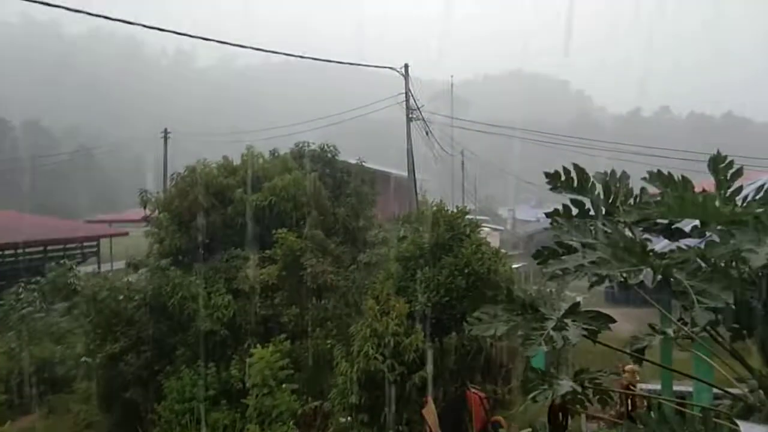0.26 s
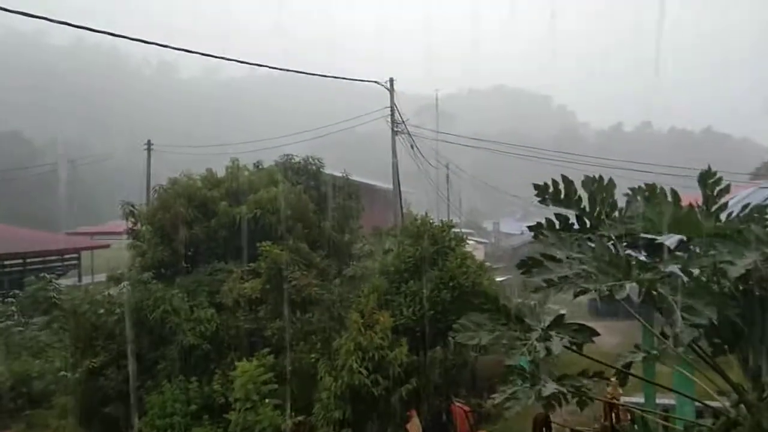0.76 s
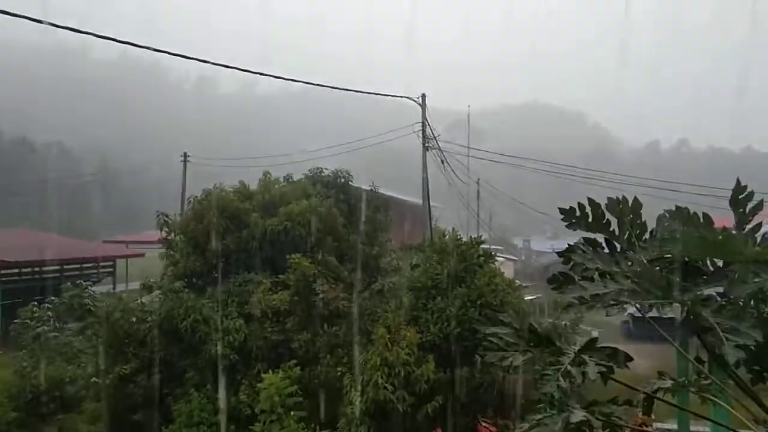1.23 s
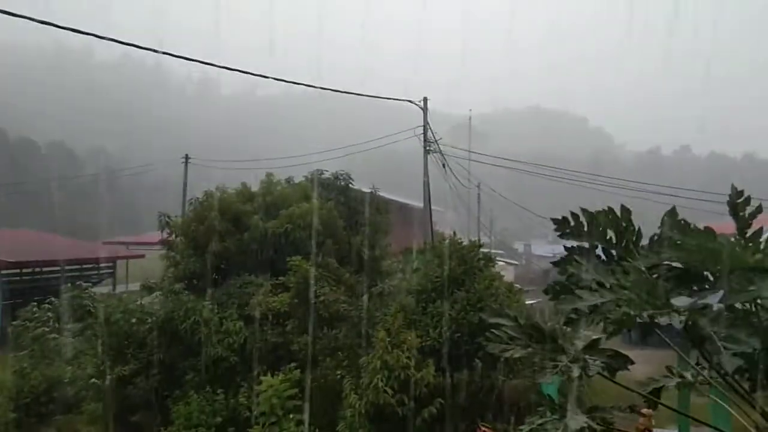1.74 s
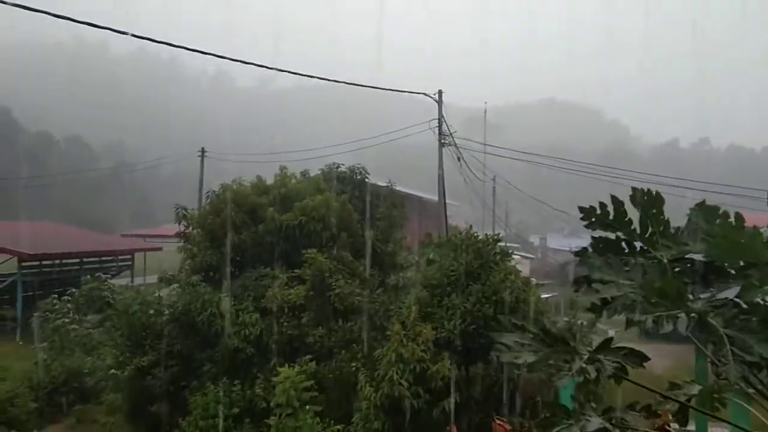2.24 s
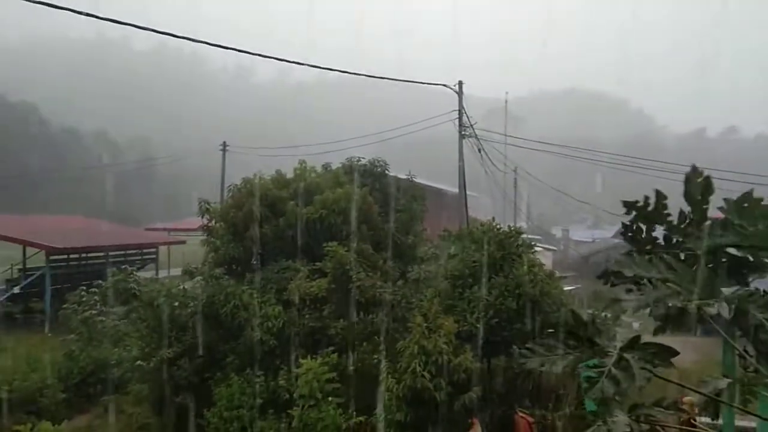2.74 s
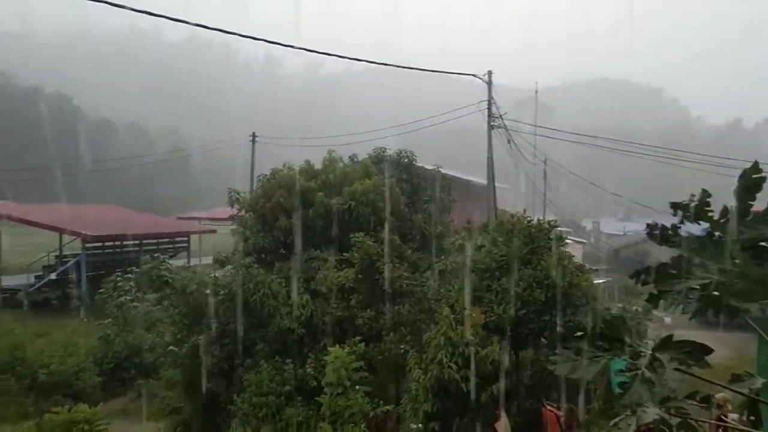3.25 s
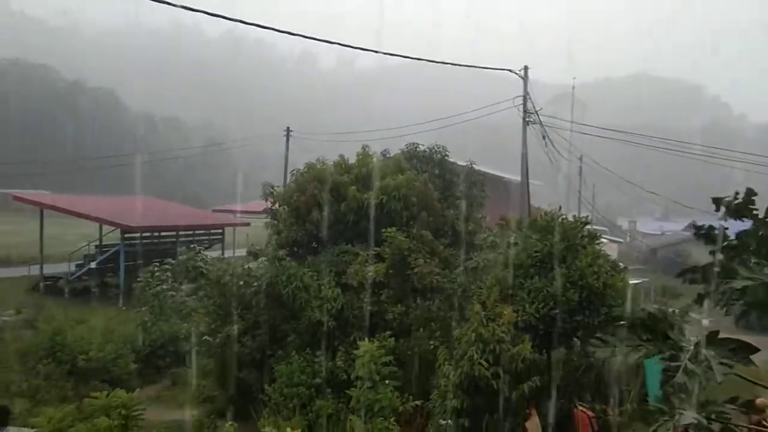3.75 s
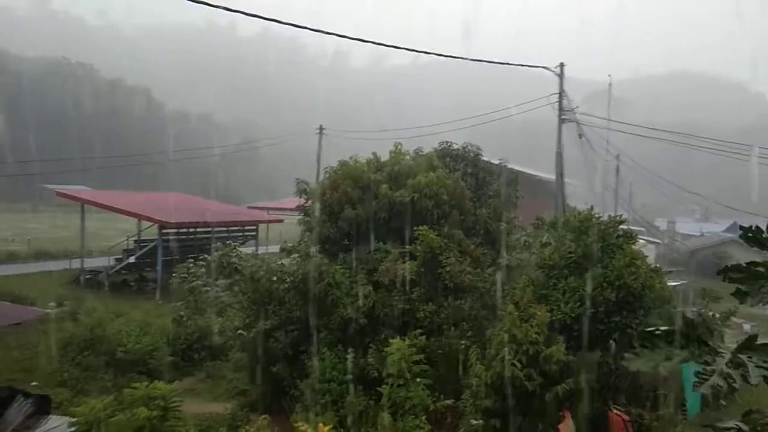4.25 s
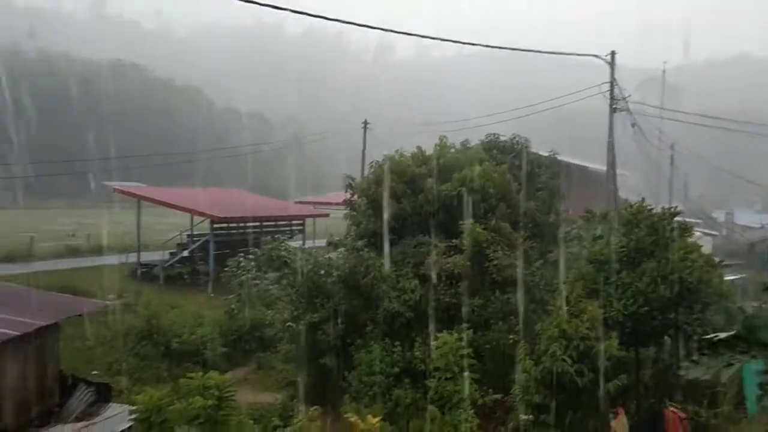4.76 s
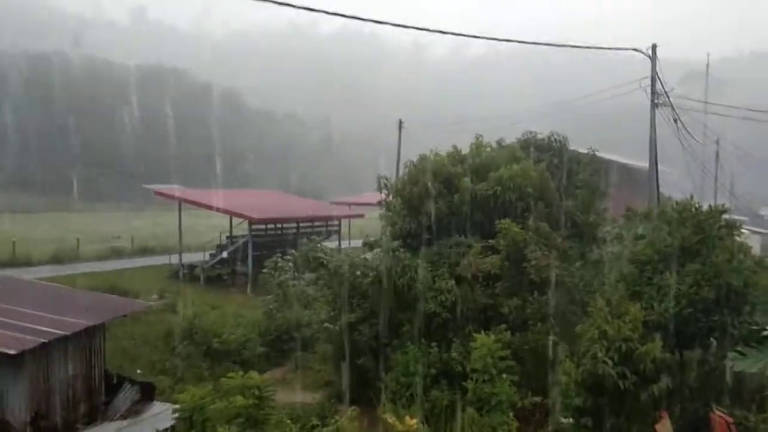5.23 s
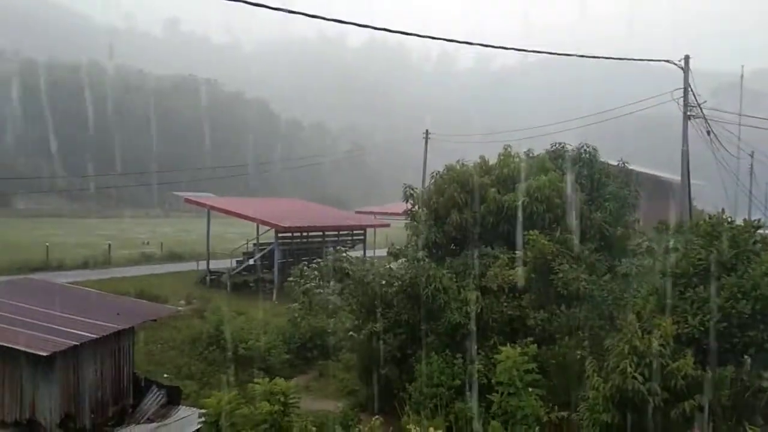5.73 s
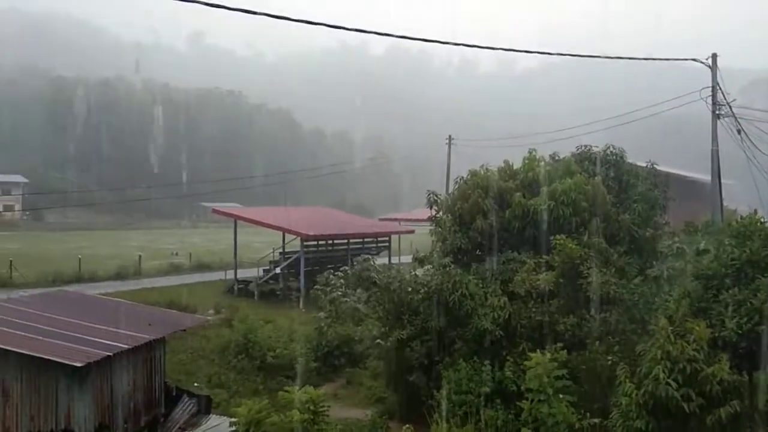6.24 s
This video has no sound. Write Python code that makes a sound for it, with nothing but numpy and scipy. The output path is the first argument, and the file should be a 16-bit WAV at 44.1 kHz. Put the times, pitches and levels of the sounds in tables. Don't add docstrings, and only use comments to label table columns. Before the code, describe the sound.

A loud, continuous hiss of torrential rain fills the whole stretch, falling on foliage, tin roofs and wet ground. Leaf spray brightens it briefly near the start, roof drumming thickens the middle, and a low wind gust rumbles at about three seconds. Small run-off slaps and faint drop ticks sit almost buried within it. It is heard outdoors from a porch through one phone microphone, nearly mono, with dulled highest treble.

```python
import sys
import numpy as np
from scipy import signal
from scipy.fft import rfft, irfft, next_fast_len
from scipy.io import wavfile
from scipy.ndimage import uniform_filter1d, minimum_filter1d

SR = 44100
rng = np.random.default_rng(int(sys.argv[2]) if len(sys.argv) > 2 else 0)


def gain_from_db(level_db):
    decades = np.asarray(level_db, float) / 20
    return 10 ** decades


def wav_record(signal):
    frames = np.transpose(np.atleast_2d(signal))
    bounded = np.clip(frames, -1, 1)
    quanta = np.round(bounded * 32767).astype(np.int16)
    wavfile.write(sys.argv[1], SR, quanta)


N = 286209


def set_rms(x, db):
    return x * gain_from_db(db) / np.sqrt(np.mean(x ** 2))


def bell(x, centre, width):
    return np.exp(-((x - centre) / width) ** 2)


def walk(rate_hz):
    hold = int(SR / rate_hz)
    steps = np.repeat(rng.standard_normal(N // hold + 1), hold)
    slewed = uniform_filter1d(uniform_filter1d(steps, hold), hold)
    return 1.4 * slewed[:N]


def downpour(near_db=-16, near_hz=9000, flicker_db=0.07, spatter_db=0.64, top_hz=15510):
    # frequency in Hz, level in dB per Hz.
    colour = [(15, -66), (25, -37), (38, -35), (70, -22.5), (113, -14), (250, -10), (270, -8.5),
              (520, -9.5), (600, -5.5), (950, -6), (1500, -3.5), (2000, -1.5),
              (2570, .5), (2950, -2.5), (3250, -7), (3550, -10), (3900, -8.5), (4300, -5.5), (5650, -3.5),
            (6200, -7.5), (7300, -19), (8400, -28), (10200, -35.5), (12000, -45.5), (13200, -43),
            (15500, -43)]
    change_db = weather()
    size = next_fast_len(N)
    octave = np.log2(np.maximum(np.arange(size // 2 + 1) * SR / size, 1))

    near_share = np.clip(gain_from_db(near_db) * 2 ** octave / near_hz, 0, .95)
    far = rfft(rng.standard_normal(N), size)
    near = rfft(near_drops(), size)
    hz, db = np.transpose(colour)
    tone = gain_from_db(np.interp(octave, np.log2(hz), db))
    spectrum = (np.sqrt(1 - near_share ** 2) * far + near_share * near) * tone
    spectrum[octave > np.log2(top_hz)] = 0

    rain, spatter = 0, walk(36)
    for centre in np.arange(4, 14.6, .5):
        crossfade = np.cos(np.pi * np.clip(octave - centre, -.5, .5)) ** 2
        band = irfft(spectrum * crossfade, size)[:N]
        restless_db = flicker_db * (1 + 1.2 * max(centre - 12.5, 0))
        spatter_here = spatter_db * bell(centre, 12.82, .8) * spatter
        rain = rain + band * gain_from_db(change_db(centre) + spatter_here + restless_db * walk(12))
    return set_rms(rain, -14)


def near_drops(drops_per_s=30000, spread_db=4.0):
    count = rng.poisson(drops_per_s / SR, N)
    size = gain_from_db(spread_db * rng.exponential(size=N))
    return set_rms(np.sqrt(count) * size * rng.standard_normal(N), 0)


def weather():
    # time in seconds, strength in dB, spray off the nearest leaves in dB as the phone turns.
    rain = [(0, 0.6, 1.6), (.6, -1.2, 5.5), (1.1, -0.35, -0.2), (1.45, 0, 1.3), (1.9, -.5, .2),
            (2.4, -0.26, 0.2), (3.0, 0.15, -1.5), (3.6, 0.3, -0.9), (4.1, .5, 0.1), (5.0, 0.66, -.5),
            (5.5, 0.4, -.4), (6.1, 0.9, -1.5), (6.49, .5, -2.8)]
    # time in seconds, rumble in dB, half length in seconds.
    gusts = [
        (.85, -3, .12),
        (3.1, 9, .35),
        (3.7, 1, .3),
        (4.3, 4, .15),
        (4.8, -2, .2),
        (5.7, 1.5, .5),
    ]
    # time in seconds, drumming in dB, half length in seconds.
    sheets = [
        (2.2, 1.5, 0.32),
        (3.0, 0.7, .2),
        (3.75, 1.6, .4),
    ]
    # time in seconds, dB above the hiss, half length in seconds.
    slaps = [(.775, 2, .012), (1.197, 2, .02), (2.67, 2, 0.013), (3.055, 1, 0.01), (4.274, 3, .015),
             (4.914, 0, 0.0067), (5.038, 4, 0.016), (5.087, 2.5, 0.0089), (5.25, 4, 0.015),
             (5.317, 2.5, 0.013), (5.38, 2, 0.018), (6.012, -1, .012), (6.38, 2, 0.011)]
    t = np.arange(N) / SR

    def bumps(rows):
        return sum(db * bell(t, at, half_s) for at, db, half_s in rows)

    s, strength_db, spray_db = np.transpose(rain)
    strength, spray = np.interp(t, s, strength_db), np.interp(t, s, spray_db)
    wind, drumming, slapping = bumps(gusts), bumps(sheets), bumps(slaps)
    spray_peak = np.log2(6000)

    def change_db(octave):
        hz = 2 ** octave
        body = strength * (1 + 0.68 * (hz > 3000))
        spray_octaves = 0.38 if octave < spray_peak else 0.93
        leaves = spray * bell(octave, spray_peak, spray_octaves)
        roofs = drumming * bell(octave, np.log2(450), 2)
        ground = slapping * bell(octave, np.log2(2550), 0.3)
        rumble = wind / (1 + (hz / 130) ** 4)
        return body + leaves + roofs + ground + rumble

    return change_db


def rail_ticks(ring_s=0.00045, width_hz=3500):
    # start in seconds, peak level in dB, base frequency in Hz (the click rings 900 Hz above it).
    rail_drops = [
        (1.4614, -27, 8100),
        (1.6564, -33, 8020),
        (1.8078, -26, 8420),
        (1.8906, -30, 8850),
        (2.4239, -26, 8090),
        (3.4835, -39, 8210),
        (4.5994, -34, 8200),
        (4.8668, -37, 8060),
        (5.6007, -28, 8680),
    ]
    out, t = np.zeros(N), np.arange(600) / SR
    for s, db, hz in rail_drops:
        splash = gain_from_db(-12) * rng.standard_normal(len(t)) * np.exp(-t / .004)
        click = np.sin(2 * np.pi * (hz + 900) * t) * np.exp(-t / ring_s)
        band = signal.butter(2, [hz - 600, hz + width_hz], "bandpass", fs=SR, output="sos")
        tick = signal.sosfilt(band, click + splash)
        start = int(s * SR)
        out[start:start + len(t)] += gain_from_db(db) * tick / np.abs(tick).max()
    return out


def side_flecks(half=1024, offset=211):
    # time in seconds, low edge in Hz, high edge in Hz, level in dB.
    flecks = [(.604, 13000, 15500, -60), (.859, 5470, 7140, -26), (.859, 8100, 9900, -48),
              (1.324, 6200, 8400, -35), (2.067, 4600, 5900, -25), (2.067, 11500, 13200, -60),
              (2.252, 5600, 7700, -30), (2.252, 10800, 12600, -69), (3.274, 7400, 9200, -43),
              (3.274, 9500, 11200, -59), (3.483, 8800, 10600, -55), (3.994, 7400, 9150, -49),
              (5.155, 6200, 7700, -36)]
    out = np.zeros(N)
    n = np.arange(2 * half) + .5 + half / 2
    bins = np.arange(half) + .5
    bin_hz = bins * SR / 2 / half
    window = signal.windows.cosine(2 * half)
    for s, low_hz, high_hz, db in flecks:
        used = (bin_hz > low_hz) & (bin_hz < high_hz)
        burst = rng.standard_normal(used.sum()) @ np.cos(np.pi / half * np.outer(bins[used], n))
        block = round((s * SR - offset) / half + .25) - 1
        start = offset + half * block
        out[start:start + 2 * half] += set_rms(burst, db) * window
    return out


def scene():
    return np.tile(downpour() + rail_ticks(), (2, 1))


def roll_off(x):
    return signal.sosfilt(signal.butter(12, 15640, fs=SR, output="sos"), x)


def record(dry):
    room = np.minimum(1, .76 / (np.abs(dry[0]) + 1e-9))
    gain = minimum_filter1d(room, size=61)
    gain = uniform_filter1d(uniform_filter1d(gain, size=31), size=31)
    opposite = np.array([[1], [-1]])
    return roll_off(dry * gain + side_flecks() * opposite)


dry = scene()
out = record(dry)
wav_record(out)
```